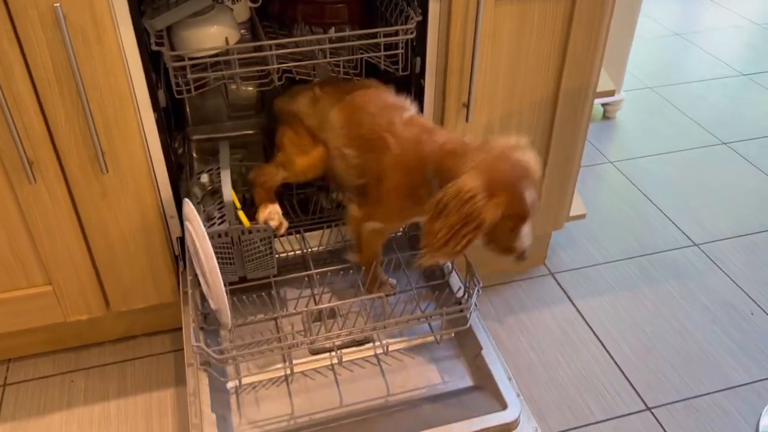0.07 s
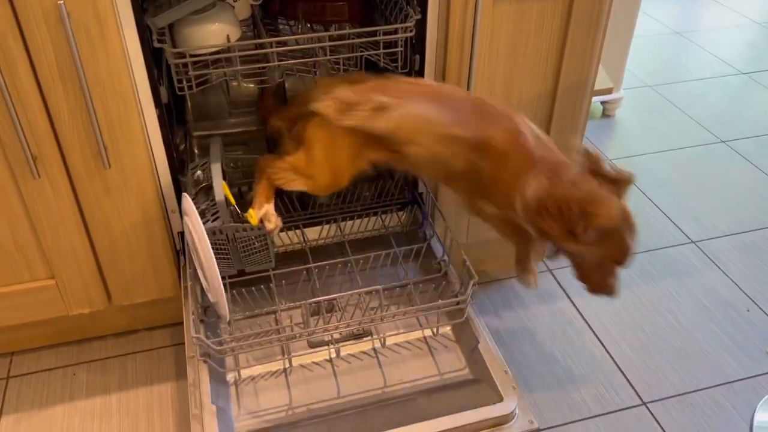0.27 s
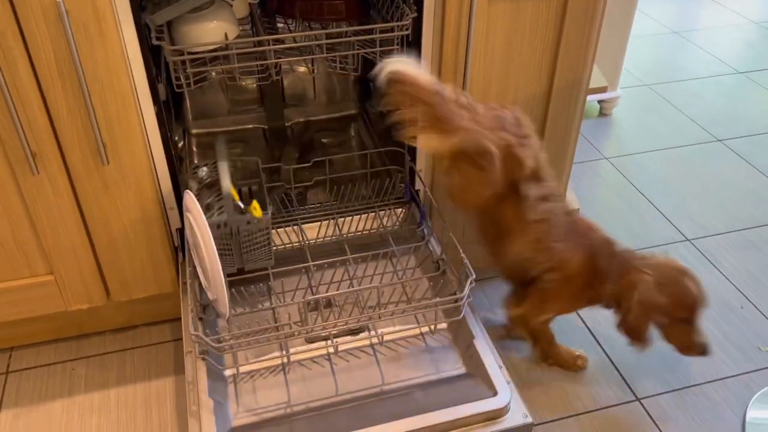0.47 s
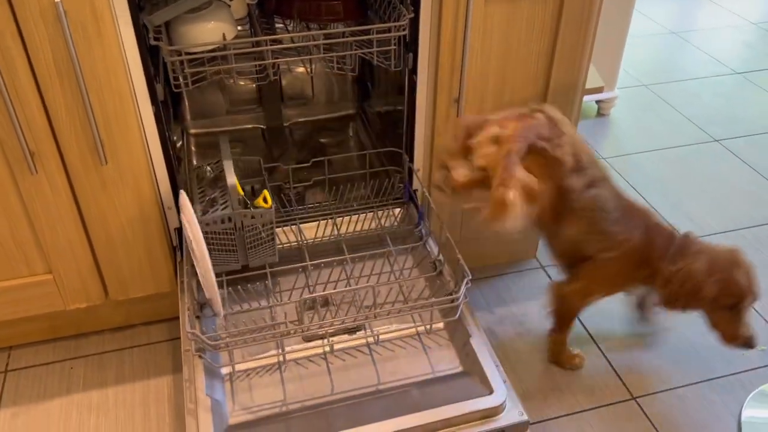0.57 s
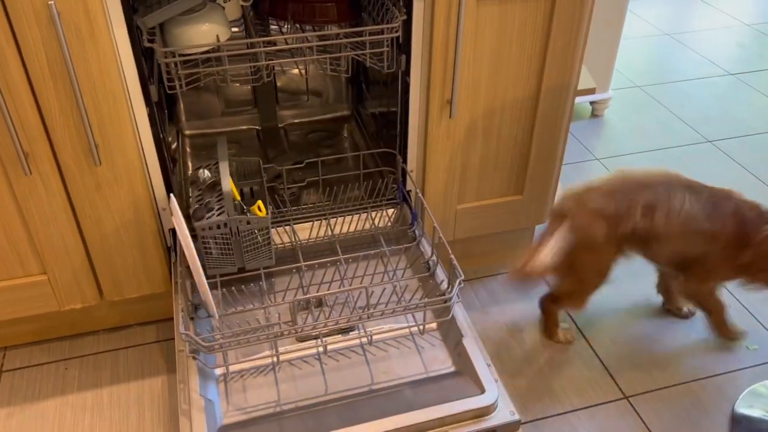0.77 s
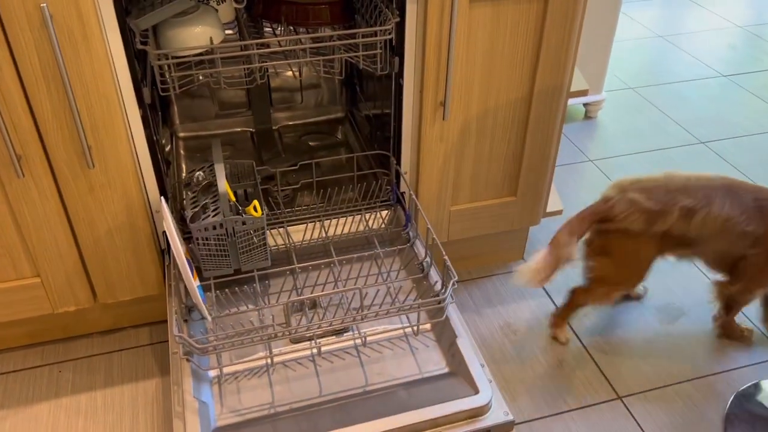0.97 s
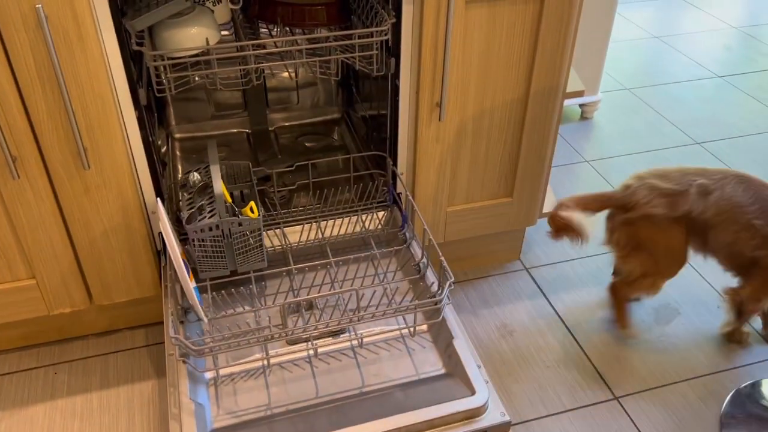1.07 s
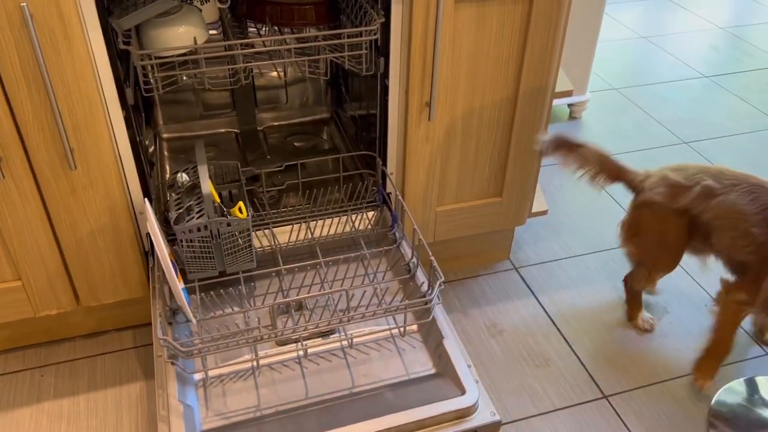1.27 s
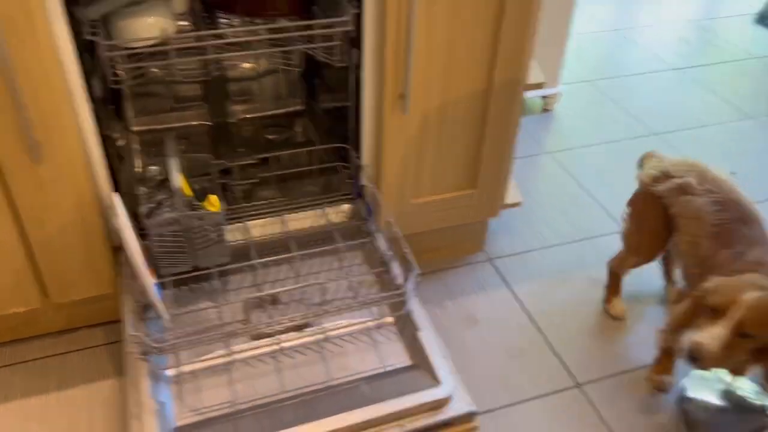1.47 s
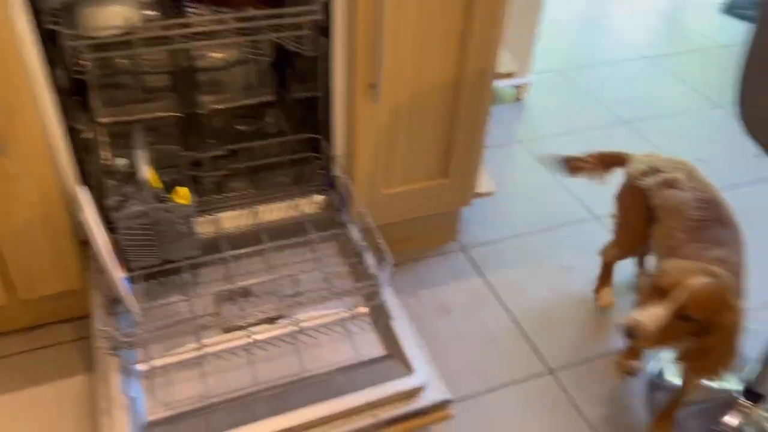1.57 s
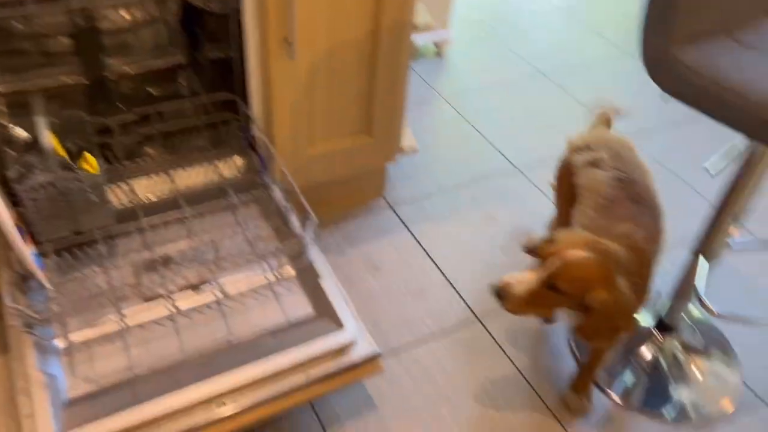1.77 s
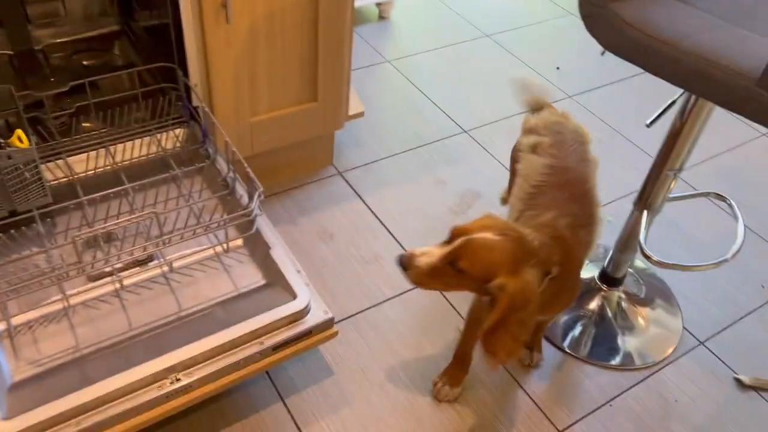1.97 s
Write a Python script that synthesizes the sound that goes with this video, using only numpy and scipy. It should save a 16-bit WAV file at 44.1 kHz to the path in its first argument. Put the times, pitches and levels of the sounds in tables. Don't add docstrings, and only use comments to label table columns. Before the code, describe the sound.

Dishwasher rack rattle, close and in stereo: hard metallic bumps, chattering wires, plate knocks and thin steel rings, dying away to a quiet room hum, then a few faint dog claw ticks on a hard floor.

```python
import sys
import numpy as np
from scipy import signal
from scipy.fft import rfft, irfft, next_fast_len
from scipy.io import wavfile
from scipy.ndimage import uniform_filter1d, map_coordinates

SR = 44100
rng = np.random.default_rng(int(sys.argv[2]) if len(sys.argv) > 2 else 0)


def voltage_ratio(decibels):
    exponent = np.asarray(decibels, float) / 20
    return 10 ** exponent


def log_audio(samples):
    frames = np.atleast_2d(samples).T
    limited = np.clip(frames, -1, 1)
    pcm = np.round(limited * 32767).astype(np.int16)
    wavfile.write(sys.argv[1], SR, pcm)


N = 89478


def unit(x):
    return x / np.sqrt(np.mean(x ** 2) + 1e-20)


def along(points, hz):
    f, v = np.transpose(points)
    return np.interp(np.log(hz + 1), np.log(f + 1), v)


def filtered(x, response):
    m = next_fast_len(N + SR // 2)
    return irfft(rfft(x, m) * response(np.fft.rfftfreq(m, 1 / SR)), m)[..., :N]


def resonances(peaks):
    def response(f):
        total = 0
        for k, (centre, width, db) in enumerate(peaks):
            damping = 1j * f * width
            total = total + (-1) ** k * voltage_ratio(db) * damping / (centre * centre - f * f + damping)
        return total
    return response


def rung(x, modes_hz, width_hz):
    return unit(filtered(x, resonances([(hz, width_hz, 0) for hz in modes_hz])))


def strength(rows):
    s, db = np.transpose(rows)
    t = np.arange(N) / SR
    return voltage_ratio(np.interp(t, s, db) - 420 * np.maximum(t - s[-1], 0))


def add(track, s, sound):
    part = track[max(round(s * SR), 0):][:len(sound)]
    part += sound[:len(part)]


def ring(hz, db, t60, attack, phase=0):
    t = np.arange(int(SR * min(1.5 * t60, 1))) / SR
    return voltage_ratio(db - 60 * t / t60) * np.sin(2 * np.pi * hz * t + phase) * (1 - np.exp(-t / attack))


def grains(rate, colour, cycles):
    size_db = 3.5
    u = rng.random((int(rate * N / SR), 3))
    lo, hi = np.log(colour[0][0]), np.log(colour[-1][0])
    hz = np.exp(lo + (hi - lo) * u[:, 1:2])
    size = voltage_ratio(along(colour, hz) - size_db * np.log(.03 + u[:, 2:])) * hz
    k = np.arange(int(4e6 / len(u)))
    turns = hz * k / SR
    fade = 1 - k / len(k)
    wave = size * np.exp(-3 * turns / cycles) * np.sin(2 * np.pi * turns) * fade / np.sqrt(hz)
    at = (u[:, :1] * N).astype(int) + k
    return unit(np.bincount(at.ravel(), wave.ravel())[:N])


def swells(x):
    swells_per_s, swell_db = 35, 3.5
    z = signal.stft(x, nperseg=256)[2]
    field = uniform_filter1d(rng.standard_normal(z.shape), size=9, axis=0)
    field = uniform_filter1d(field, size=SR // 128 // swells_per_s, axis=1)
    return unit(signal.istft(z * voltage_ratio(swell_db * unit(field)), nperseg=256)[1][:N])


# time_s, level_db
SHAKE_ENVELOPE = [(0.0, -21.5), (0.14, -39), (0.166, -29.5), (0.19, -37.5), (0.224, -27), (0.286, -41.5),
                  (0.3, -28), (0.38, -40), (0.506, -28.5), (0.752, -45), (0.766, -44), (0.792, -31),
                  (1.032, -58), (1.3, -61)]
# time_s, level_db
CHATTER_ENVELOPE = [(0.0, -10), (0.042, -27.5), (0.198, -38.5), (0.21, -22.5), (0.336, -39), (0.422, -28),
                    (0.6, -42.5), (0.63, -40), (0.868, -70), (0.878, -33), (0.9, -63.5), (1.092, -98),
                    (1.194, -63), (1.3, -80.5)]
# pitch_hz, level_db
BUMP_COLOUR = [(70, -8), (145, -15.5), (210, 6), (400, -1), (900, -3.5), (1500, -11), (1800, -16)]
# pitch_hz, level_db
TINE_COLOUR = [(700, -3), (2260, -7.5), (4000, -8.5), (7000, -3.5), (9000, -11.5), (12000, -2.5),
               (15800, -9.5)]
FRAME_HZ = [195, 237, 339, 475, 858, 925, 1180, 1525]
WIRE_HZ = [1525, 2054, 2318, 2630, 3320, 4050, 4660, 5540]


def rack():
    rack_db, frame_db, chatter_db, shared_db = -6, -4.5, -5, -18
    jingle_db, wire_db = -16, -6
    bumps = grains(500, BUMP_COLOUR, cycles=8.1)
    pings = swells(grains(3000, TINE_COLOUR, cycles=12))
    shake = strength(SHAKE_ENVELOPE)
    body = (bumps + voltage_ratio(frame_db) * rung(bumps, FRAME_HZ, width_hz=4.7)) * shake
    jingle = voltage_ratio(jingle_db) * rung(np.diff(pings, prepend=0), STEEL_HZ, width_hz=120)
    wires = voltage_ratio(wire_db) * swells(rung(pings, WIRE_HZ, width_hz=60))
    chatter = voltage_ratio(chatter_db) * strength(CHATTER_ENVELOPE) + voltage_ratio(shared_db) * shake
    return voltage_ratio(rack_db) * body + (pings + jingle + wires) * chatter


# start_s, peak_db, pitch_hz
JOLTS = [(0.007, -12.5, 312), (0.027, -15.5, 301), (0.044, -16, 468), (0.074, -17.5, 323),
         (0.149, -23.5, 487), (0.164, -19, 301), (0.206, -18, 530), (0.234, -24, 866), (0.294, -17, 377),
         (0.319, -19.5, 401), (0.363, -25.5, 411), (0.434, -28, 466), (0.478, -19.5, 393),
         (0.499, -26.5, 318), (0.544, -21.5, 391.6), (0.574, -32.5, 484), (0.601, -23.5, 382),
         (0.641, -37, 369), (0.778, -34.5, 308), (0.794, -24.5, 364), (0.814, -32, 452), (0.859, -30, 312),
         (0.873, -35.5, 500), (0.925, -38.5, 311), (0.954, -43.5, 382), (0.978, -45.5, 444)]


def thuds():
    t60_s, width_ratio, thud_db = 0.056, .9, -3
    out, t = np.zeros(N), np.arange(SR // 8) / SR
    f = np.fft.rfftfreq(len(t), 1 / SR)
    for s, db, hz in JOLTS:
        colour = resonances([(hz, width_ratio * hz, 0)])(f) / (1 + (f / 2000) ** 2)
        puff = irfft(rfft(rng.standard_normal(len(t))) * colour, len(t))
        add(out, s, voltage_ratio(db + thud_db - 60 * t / t60_s) * (1 - np.exp(-t / .002)) * unit(puff))
    return out


# start_s, peak_db, pitch_hz, brightness_db
PLATE_KNOCKS = [(0.0094, -24.5, 2560, 11.5), (0.0258, -14.5, 2440, -2.5), (0.0304, -8, 2174, -5),
                (0.0744, -38, 2250, 8), (0.0972, -27, 1520, 2), (0.1486, -31, 2270, 0.5),
                (0.159, -24, 4640, 5.5), (0.1964, -21, 2400, -8.5), (0.2059, -16, 2260, 1),
                (.212, -18.5, 2330, 2), (0.2598, -23, 2230, 10), (.265, -26, 2400, -8),
                (0.2944, -27.5, 2570, 8), (0.3626, -29.5, 3100, 5.5), (.381, -20.5, 1490, 0.5),
                (.4334, -30, 1550, 5.5), (0.4364, -23.5, 3200, 0.5), (0.5107, -27, 2000, 5),
                (.52, -28, 2600, 4), (0.5444, -20, 2795, -2), (0.5501, -14.5, 2176, -9),
                (0.5955, -20, 2370, -12.5), (0.6769, -28.5, 2213, 5), (0.7771, -31.5, 2010, -8),
                (0.8315, -34.5, 2100, 9), (0.8759, -18, 2466, -9), (0.8834, -26, 2540, -4),
                (0.9282, -29.5, 2210, -17), (.938, -37.5, 2860, -8), (.948, -36, 2550, -6),
                (1.1199, -42.5, 2265, 2), (1.125, -44, 1500, -12), (1.1777, -39, 2487, 4),
                (1.4371, -55, 2205, -2), (1.5569, -58.5, 2052, -4), (1.6844, -61, 2060, -4.5)]
# pitch_ratio, level_db
PLATE_MODES = [(.62, -15.5), (0.899, -5.5), (1.001, 3.5), (1.138, -2.5), (1.319, -5), (1.9, -27)]
# pitch_hz, width_hz, level_db
CRACK_COLOUR = [(1500, 810, -1), (2600, 1800, 0.5), (6000, 1700, -1.5), (13000, 6000, -15.5)]
# start_s, pitch_hz, level_db, t60_s
CROCKERY_RINGS = [
    (.026, 2140, -25.5, 0.29),
    (.097, 1480, -30.5, 0.06),
    (.207, 1486, -24.5, 0.064),
    (.262, 2240, -17, 0.047),
    (.381, 1500, -35.5, .1),
    (.206, 2372, -40, 0.13),
    (.551, 2053, -26.5, 0.25),
    (.884, 2068, -22, 0.067),
    (.884, 2977, -24.5, 0.045),
    (.884, 1377, -33.5, 0.076),
]


def plate():
    plate_db, plate_t60_s, rise_s = -1, .013, .0007
    crack_db, crack_t60_s, dullest_db = 5, .03, -12
    soft_db, soft_hz = -34, 3500
    out, t = np.zeros(N), np.arange(SR // 10) / SR
    cracks = np.zeros((2, N))
    for s, db, hz, bright_db in PLATE_KNOCKS:
        luck = rng.normal(0, 2, len(PLATE_MODES))
        phases = rng.uniform(0, 2 * np.pi, len(PLATE_MODES))
        clack = sum(ring(ratio * hz, db + plate_db + level + d, plate_t60_s, rise_s, phase)
                    for (ratio, level), d, phase in zip(PLATE_MODES, luck, phases))
        add(out, s, clack)
        add(out, s + rng.uniform(.004, 0.011), 0.5 * clack)
        burst_db = db + crack_db + max(bright_db, dullest_db)
        burst = voltage_ratio(burst_db - 60 * t / crack_t60_s) * (1 - np.exp(-t / rise_s))
        add(cracks[int(db < soft_db)], s, burst * rng.standard_normal(len(t)))
    for s, hz, db, t60 in CROCKERY_RINGS:
        for detune in (1, 1.022, .985):
            level = db - 4 - 150 * abs(detune - 1)
            add(out, s, ring(hz * detune, level, t60, 0.002, rng.uniform(0, 2 * np.pi)))

    def crack_response(f):
        dulling = np.array([1 + 0 * f, (1 + 1j * f / soft_hz) ** 2])
        return resonances(CRACK_COLOUR)(f) / dulling

    return out + filtered(cracks, crack_response).sum(axis=0)


STEEL_HZ = [6698, 6870, 7280, 7882, 9030, 10570, 12095, 13151, 13800, 14243, 15052, 15620]
# start_s, level_db, t60_s
STEEL_STRIKES = [
    [(.61, -36.5, 0.42), (.94, -54, 0.32)],
    [(0.406, -29, 0.29)],
    [(0.072, -28.5, 0.19)],
    [(.22, -25.5, 0.1), (.355, -32, 0.91), (.46, -39.5, 0.18), (.61, -38.5, 0.26)],
    [(.22, -32.5, 0.32), (.53, -40, 0.62)],
    [(.59, -30, 0.13), (.62, -26, 0.42), (.68, -32, 0.43), (.73, -31, 0.19)],
    [(.073, -23.5, 0.1), (.1, -27.5, 0.59), (.41, -40, 0.34), (.525, -30.5, 0.37), (.8, -41, 0.067)],
    [(.09, -32.5, 0.18), (0.352, -29.5, 0.61), (.63, -53, 0.19)],
    [(.153, -23.5, 0.16), (.22, -28.5, 0.17), (.355, -31, 0.2), (.4, -36, 0.1), (.55, -35, 0.15)],
    [(.073, -27, 0.27), (.61, -35.5, 0.22), (.67, -37, 0.61), (.73, -48, 0.32)],
    [(.22, -27.5, 0.28), (.43, -26, 0.21), (.47, -28, 0.53), (.525, -29.5, 0.31), (.61, -36.5, .1)],
    [(.073, -34, 0.64), (.46, -36, 0.29), (.53, -31, 0.23), (.78, -54, 0.18)],
]


def cutlery():
    beat_hz, longest_s = 25, .5
    flutters_per_s, flutter_db = 45, 3.5
    out = np.zeros(N)
    for hz, strikes in zip(STEEL_HZ, STEEL_STRIKES):
        mode, knots = np.zeros(N), rng.standard_normal(3 * flutters_per_s)
        for s, db, t60 in strikes:
            phase, off = rng.uniform(0, 2 * np.pi), rng.normal()
            life = min(t60, longest_s)
            add(mode, s, ring(hz, db, life, 0.002, phase))
            add(mode, s, ring(hz + off * beat_hz, db - 6, life / 2, .001))
        flutter = map_coordinates(knots, [np.arange(N) * flutters_per_s / SR])
        out += mode * voltage_ratio(flutter_db * flutter)
    return out


# start_s, peak_db, pitch_hz, t60_s
PAW_THUMPS = [(0.004, -3, 308, 0.026), (0.231, -23, 930, 0.045), (.293, -24.5, 1156, 0.058),
              (.305, -21.5, 915, 0.046), (.793, -23, 340.4, 0.039), (.15, -20.5, 195, 0.15),
              (0.17, -26, 82, 0.16), (0.292, -19.5, 368, 0.079), (0.489, -25.5, 254, 0.074),
              (0.501, -28.5, 51.8, 0.29), (.53, -31.5, 517, 0.046), (.6, -36, 203, 0.079),
              (.79, -34, 493, 0.1), (0.781, -36, 205.5, .15), (0.798, -33.5, 82.6, 0.19),
              (1.1, -53, 235.5, 1), (1.166, -48.5, 353, 0.1), (1.352, -37, 52, 0.12),
              (1.372, -23, 54, 0.11), (1.646, -53.5, 95.4, 0.18)]
# start_s, peak_db, pitch_hz
CLAW_TICKS = [
    (1.8023, -49.5, 3125),
    (1.8262, -52, 3040),
    (1.8454, -54, 3050),
    (1.8623, -52.5, 1970),
    (1.885, -67, 1974),
    (2.0009, -51, 5290),
    (2.0114, -50.5, 3900),
]


def dog():
    scuff_s, scuff_len_s, scuff_db = 1.85, 0.032, -64
    out, t = np.zeros(N), np.arange(N) / SR
    for s, db, hz, t60 in PAW_THUMPS:
        add(out, s, ring(hz, db, t60, 1.5 / hz))
        add(out, s, ring(1.7 * hz, db - 6, t60 / 2, 1 / hz))
    for s, db, hz in CLAW_TICKS:
        add(out, s, ring(hz, db - 3.5, 0.0084, .0002))
        add(out, s, ring(0.92 * hz, db - 2, 0.0033, .0002))
        add(out, s, voltage_ratio(db - 8 - 60 * t[:SR] / 0.00358) * rng.standard_normal(SR))
    scuff = grains(3200, [(1500, 8), (3000, -1.5), (9000, -6.5)], cycles=3.3)
    return out + voltage_ratio(scuff_db) * np.exp(-.5 * ((t - scuff_s) / scuff_len_s) ** 2) * scuff


# pitch_hz, t60_s
ROOM_DECAY = [(50, 0.45), (200, 0.56), (2000, 0.62), (7000, 0.59), (14000, 0.29)]


def kitchen(x):
    hz, t, z = signal.stft(rng.standard_normal((2, SR // 2)), SR, nperseg=256)
    decay = voltage_ratio(-60 * t / along(ROOM_DECAY, hz)[:, None])
    tail = signal.istft(z * decay, SR, nperseg=256)[1]
    late = np.pad(x, (220, 0))[None]
    return signal.fftconvolve(late, tail / np.linalg.norm(tail[0]), axes=1)[:, :N]


# pitch_hz, level_db
AIR_COLOUR = [(40, 2), (165, -6), (280, -16), (700, -22.5), (2300, -29.5), (4900, -48.5), (6800, -42.5),
              (15700, -47)]
# pitch_hz, width_hz, level_db
MURMUR = [(354, 22, -58.5), (964, 310, -60)]


def hum():
    hum_db = -56
    air = filtered(rng.standard_normal((2, N)), lambda f: voltage_ratio(along(AIR_COLOUR, f)))
    murmur = filtered(rng.standard_normal((2, N)), lambda f: resonances(MURMUR)(f) / (1 + (f / 1800) ** 4))
    return voltage_ratio(hum_db) * unit(air) + 8 * murmur


# pitch_hz, level_db
PORT_WIDTH = [(350, -14), (700, -0.5), (3000, -3.5), (8700, -2), (10000, 23), (11400, 5.5), (13500, -22),
              (15300, 6)]


def scene():
    wet_db, near_wet_db, left = -2, -10, .24
    deep = rack() + thuds() + dog()
    near = plate() + cutlery()
    dry = deep + near
    wet = kitchen(voltage_ratio(wet_db) * deep + voltage_ratio(near_wet_db) * near)
    quarter_turn = filtered(dry, lambda f: 1j + 0 * f)
    a, b = np.array([dry, quarter_turn]) + wet + hum()

    def mid_and_side(f):
        angle = np.arctan(voltage_ratio(along(PORT_WIDTH, f)))
        return np.array([np.cos(angle), np.sin(angle)])

    mid, side = filtered(np.array([a, b]), mid_and_side)
    side = side + left * filtered(mid, lambda f: (f > 400) * (f < 8000))
    return np.array([mid + side, mid - side])


def low_pass(x):
    return signal.sosfilt(signal.butter(12, 15890, fs=SR, output="sos"), x)


def record(dry):
    low_hz, top_hz = 32, 15890
    mix = filtered(dry, lambda hz: (hz < top_hz) / (1 + (low_hz / (hz + .1)) ** 4))
    return low_pass(mix)


dry = scene()
out = record(dry)
log_audio(out)
```